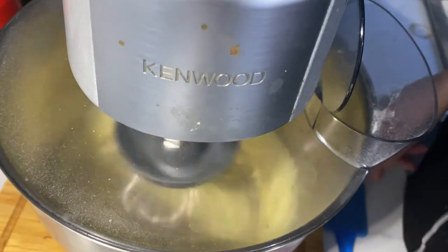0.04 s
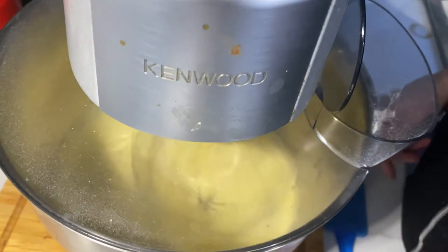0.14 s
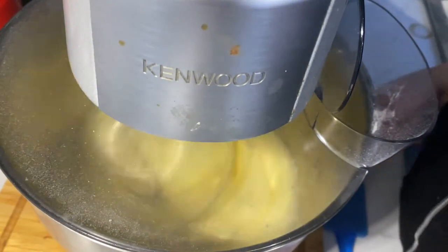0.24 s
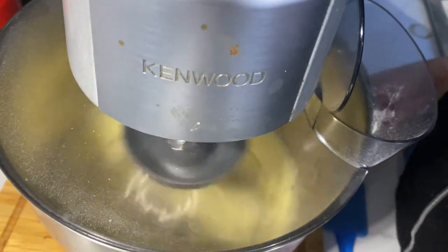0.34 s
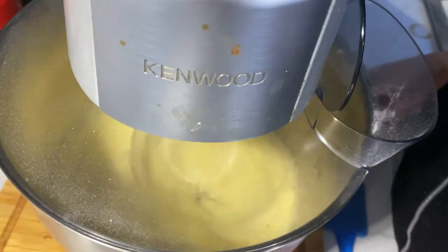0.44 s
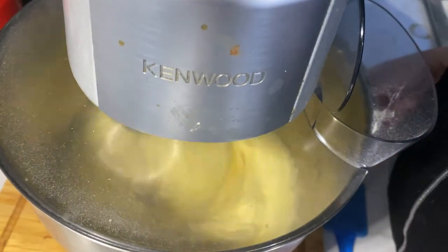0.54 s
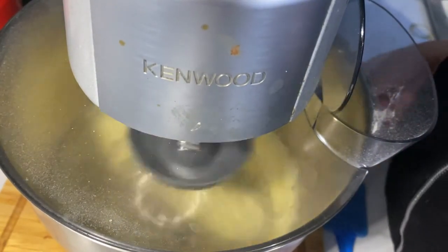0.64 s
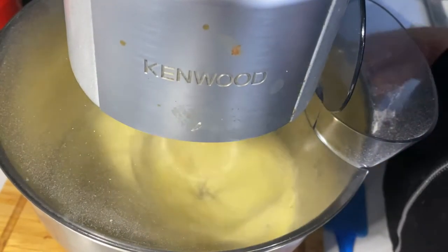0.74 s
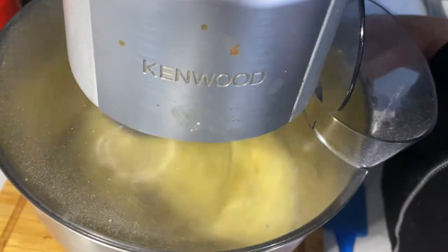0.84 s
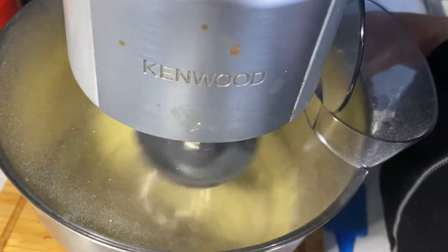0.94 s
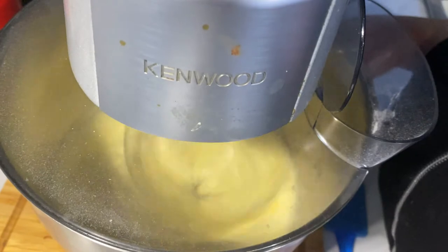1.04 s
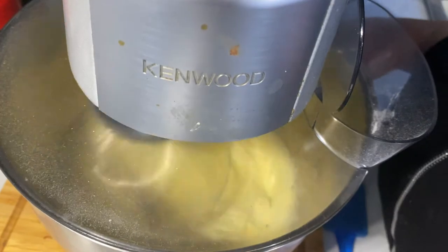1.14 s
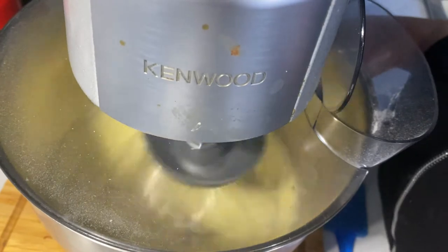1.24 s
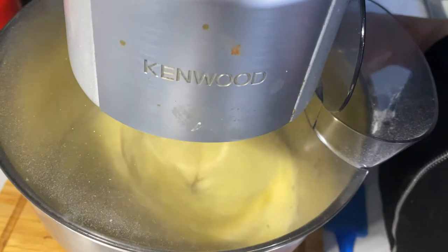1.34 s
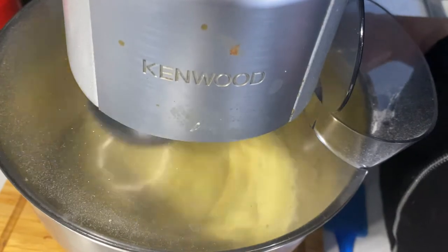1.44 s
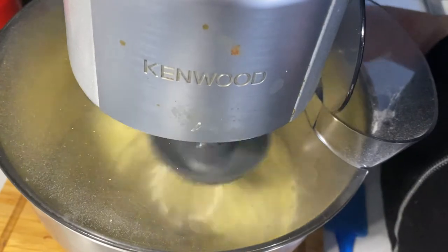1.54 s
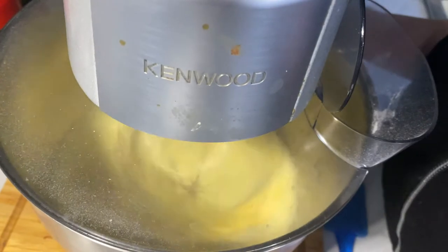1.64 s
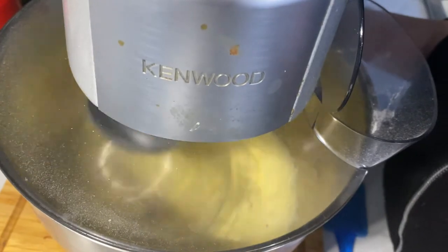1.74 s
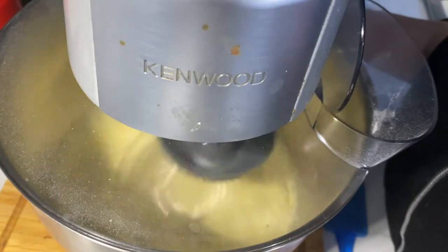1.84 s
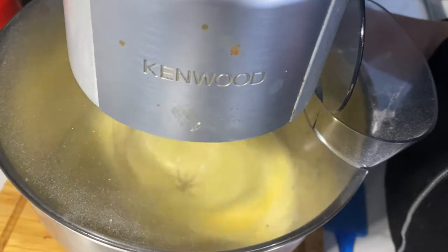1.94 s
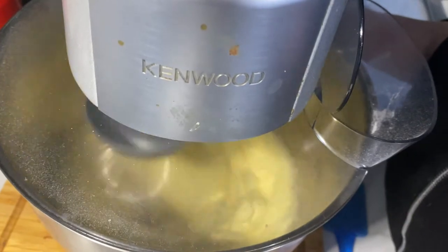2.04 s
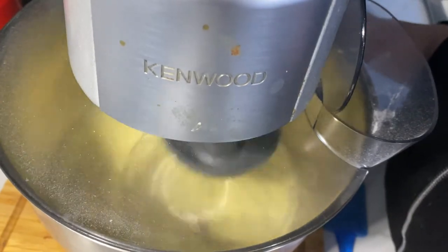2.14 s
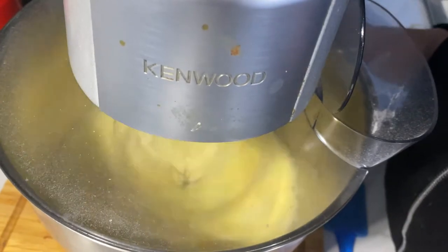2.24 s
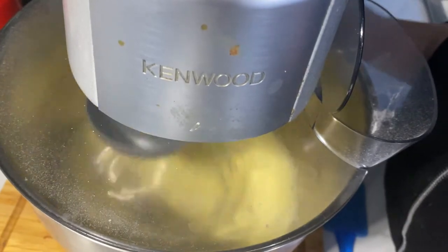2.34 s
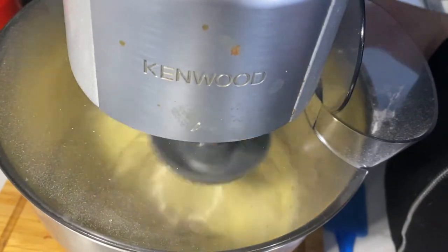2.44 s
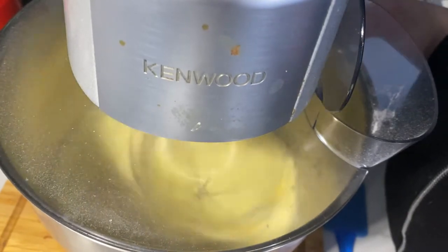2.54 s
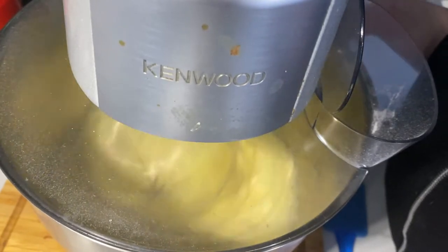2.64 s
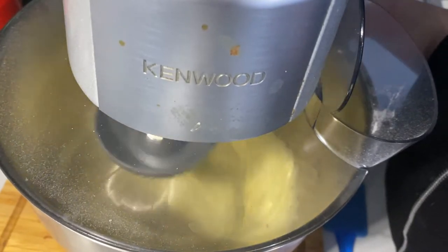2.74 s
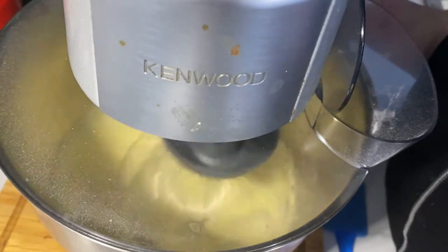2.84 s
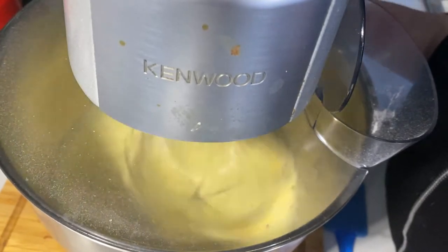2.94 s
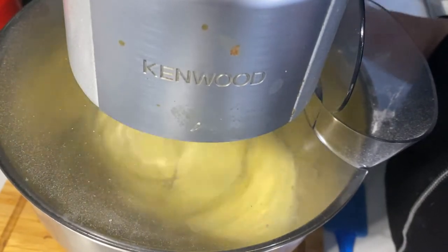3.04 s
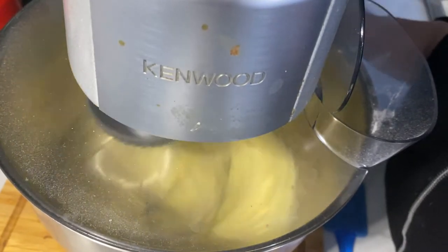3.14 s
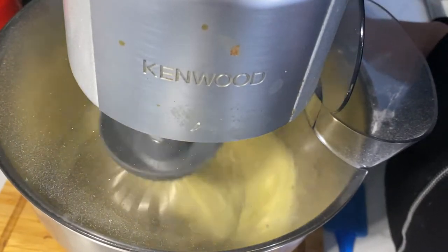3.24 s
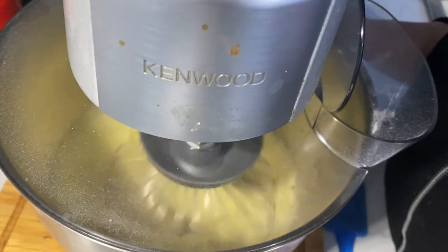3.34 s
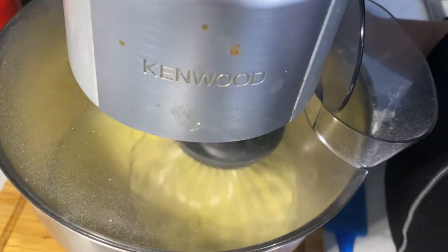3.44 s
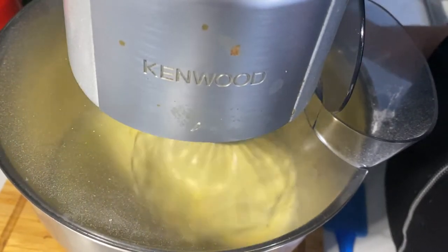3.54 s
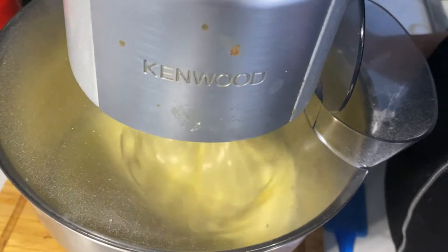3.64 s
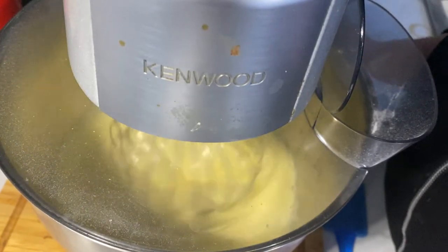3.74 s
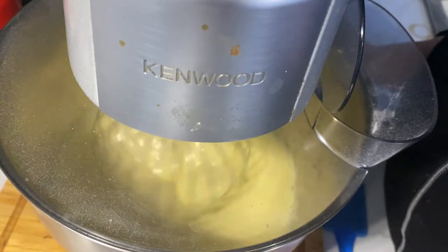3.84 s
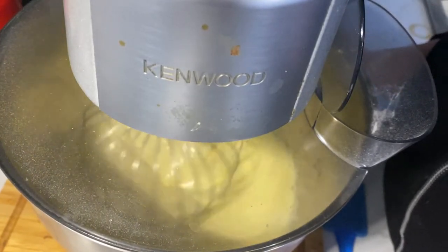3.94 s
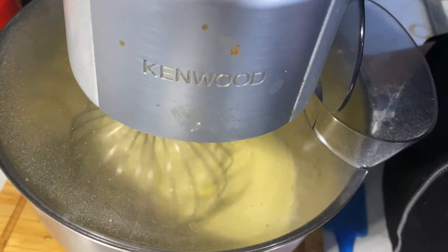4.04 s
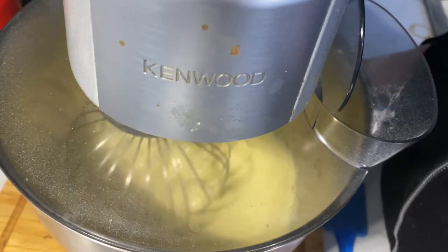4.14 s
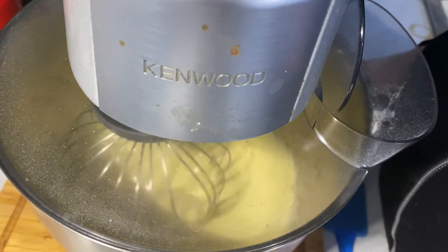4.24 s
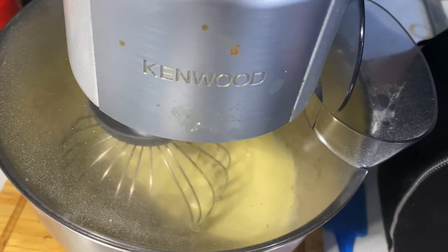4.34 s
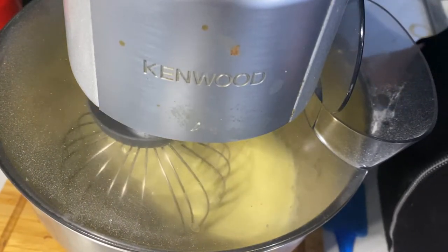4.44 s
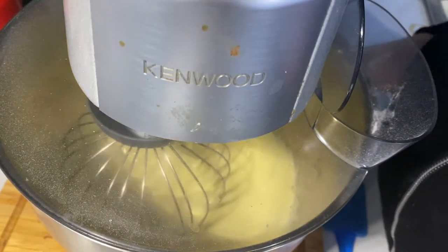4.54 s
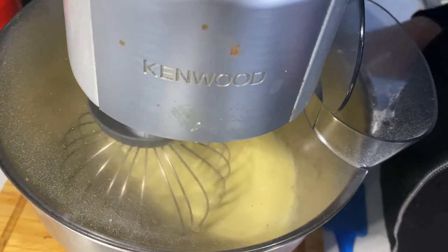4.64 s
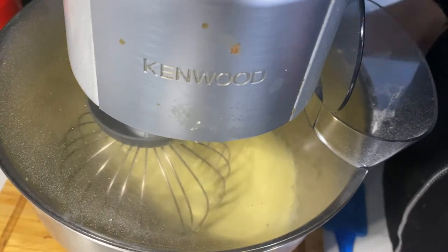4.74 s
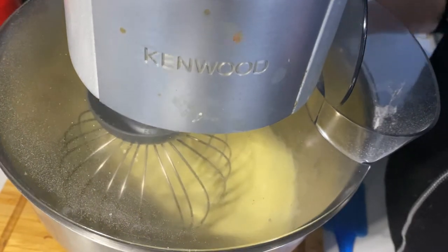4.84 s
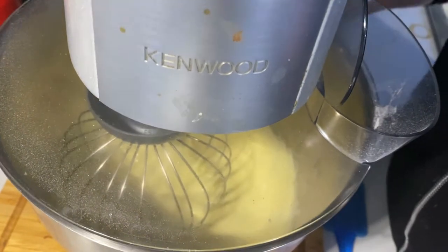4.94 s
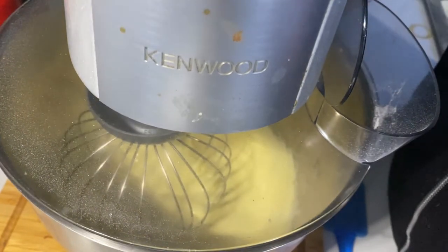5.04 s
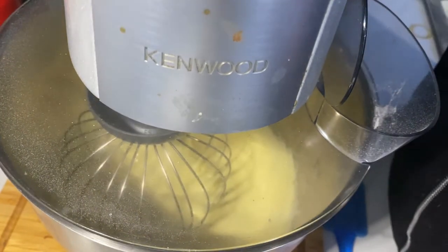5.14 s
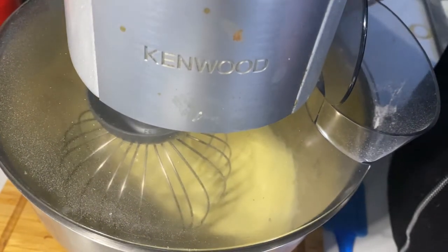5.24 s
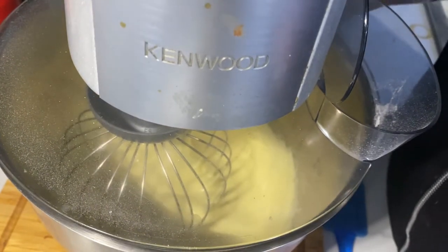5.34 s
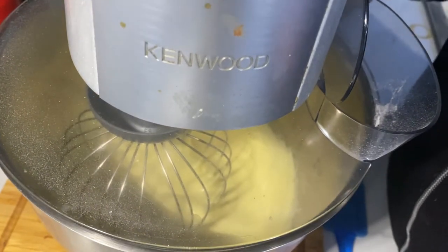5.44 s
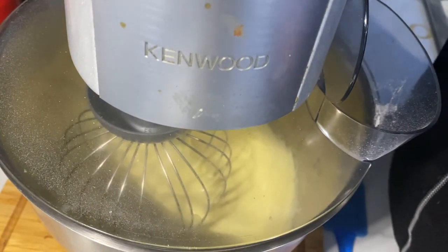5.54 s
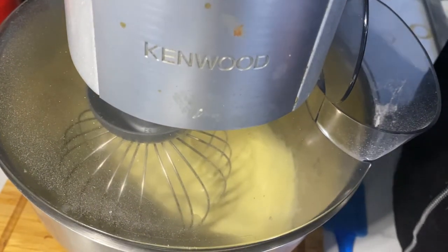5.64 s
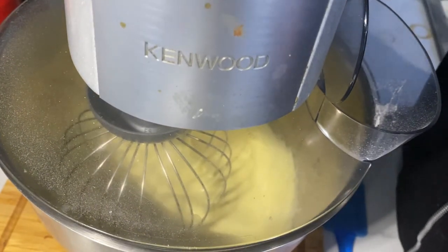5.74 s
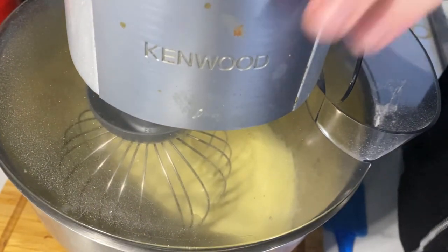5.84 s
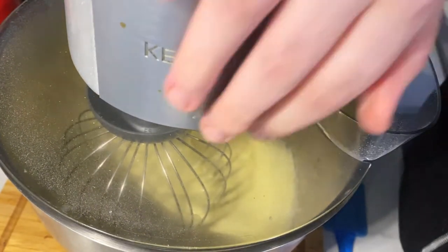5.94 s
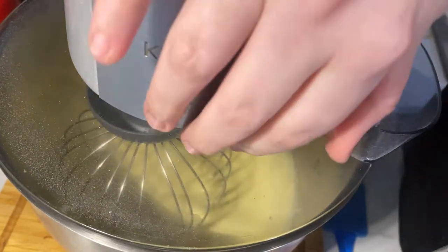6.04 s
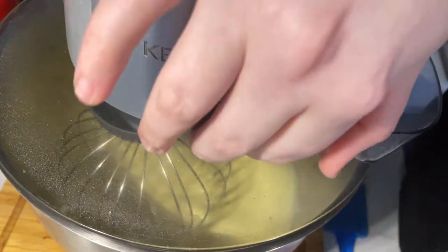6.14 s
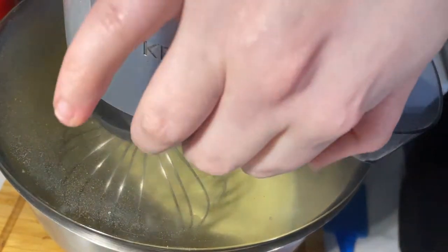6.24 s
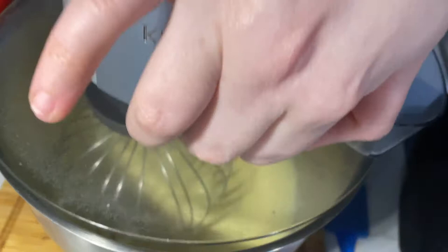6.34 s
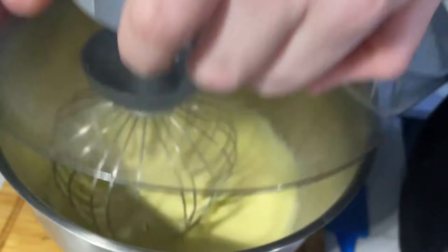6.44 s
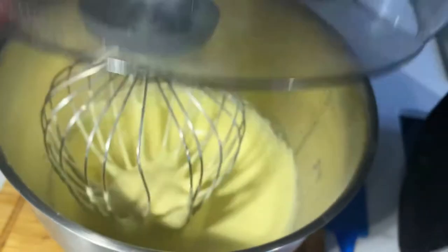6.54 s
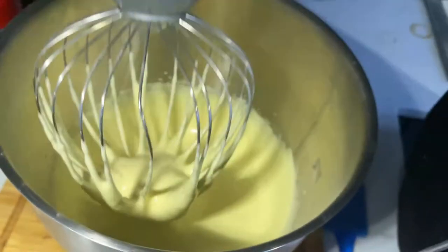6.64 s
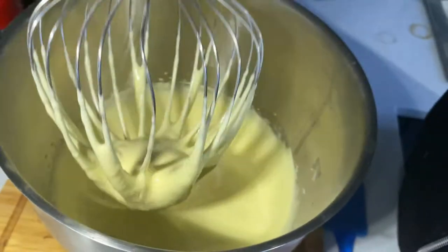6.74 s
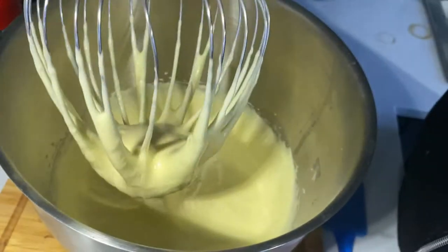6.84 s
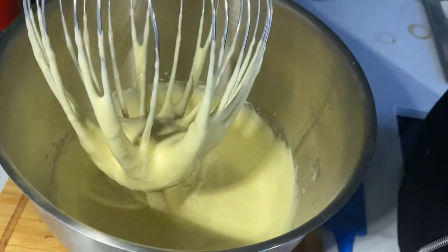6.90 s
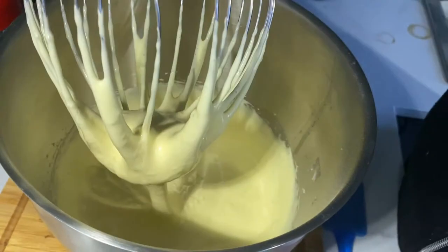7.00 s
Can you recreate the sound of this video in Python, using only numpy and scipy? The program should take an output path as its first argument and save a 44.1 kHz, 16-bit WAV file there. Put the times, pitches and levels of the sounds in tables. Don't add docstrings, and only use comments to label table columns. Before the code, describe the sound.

A loud electric mixer drones, whines and rushes steadily, close to a phone-like stereo microphone. Switched off, it coasts down in a long falling whine with passing resonances, thinning into gear rattle and a few dull knocks. In the near-quiet kitchen afterwards, hands make sharp plastic clicks, low thuds, faint skin rubbing and gritty hinge scrapes while tipping the head up. A slight short echo surrounds it.

```python
import sys
import numpy as np
from scipy import signal
from scipy.fft import rfft, irfft, next_fast_len
from scipy.io import wavfile
from scipy.ndimage import uniform_filter1d

SR = 44100
rng = np.random.default_rng(int(sys.argv[2]) if len(sys.argv) > 2 else 0)


def voltage_ratio(decibels):
    exponent = np.asarray(decibels, float) / 20
    return 10 ** exponent


def generate_wav(sig):
    pcm = np.round(np.clip(np.atleast_2d(sig).T, -1, 1) * 32767).astype(np.int16)
    wavfile.write(sys.argv[1], SR, pcm)


N = 311781
M = next_fast_len(N)
T = np.arange(N) / SR
F = np.maximum(np.arange(M // 2 + 1) * SR / M, 1)
SWITCH_OFF_S = 2.36

# (time [s], shaft speed [Hz])
MOTOR_SPEED = [(0, 227.9), (2.2, 226.6), (2.36, 212.1), (2.53, 187.8), (2.66, 171.3), (2.97, 150),
               (3.11, 136.1), (3.32, 107.1), (3.6, 79.9),
               (3.75, 67.2), (3.915, 57), (4.095, 42.7), (4.198, 34.2), (4.258, 28.5), (4.3, 24.4),
              (4.42, 12), (4.52, 1)]
# (multiple of shaft speed [-], level [dB])
SHAFT_TONES = [(.657, -38), (1.32, -47.5), (1.44, -42.5), (3.0, -44), (4.0, -40), (4.53, -46.5),
               (5.17, -44), (6.0, -65), (7.0, -36.5), (7.32, -45), (8.0, -53.5), (9.0, -42.5),
               (9.52, -47.5), (10.0, -39), (10.5, -44), (11.0, -55.5), (11.33, -54.5), (11.68, -44.5),
               (12.0, -49), (12.33, -44.5), (12.9, -48), (14.0, -43.5)]
# (frequency [Hz], width above [Hz], width below [Hz], tone level [dB])
ROCKING_SPEEDS = [(218, 50, 30, -32), (177, 26, 4, -25.5), (147, 30, 4, -28.5), (108, 36, 3, -22.5),
                  (81.5, 24, 3, -19.5), (68, 8, 6, -38)]
# (multiple of shaft speed [-], frequency [Hz], width above [Hz], width below [Hz], tone level [dB])
GEAR_ROCKING_SPEEDS = [(.657, 104, 24, 8, -32), (1.75, 175, 110, 20, -34), (3, 200, 70, 14, -43)]
# (frequency [Hz], width [Hz], level [dB])
FRAME_MODES = [(108, 23, 17.5), (193, 16, 27), (330, 43, -1.5), (1626, 83, 16), (1888, 17, 18),
               (2090, 200, 8), (1204, 110, 16)]
# (frequency [Hz], width [Hz], level [dB])
BRUSH_MODES = [(2030, 230, 0), (1000, 160, -6), (1450, 140, -6), (2430, 120, -7), (3050, 250, -7),
               (4700, 900, -8), (10500, 4000, -8)]
# (shaft speed [Hz], width [Hz], level [dB])
WHINE_PEAKS = [(160, 34, -36.5), (105, 40, -46), (48, 30, -42)]
ROAR_LAYER_HZ = [110, 420, 1500, 5000]
# (level at full speed [dB], power of speed [-], step at switch-off [dB])
ROAR_LAYER_LAWS = [(-32, 0.63, 0), (-27.5, 1.1, -1), (-28, 1.35, -1.5), (-29.5, 2.09, 1.5)]
# (frequency [Hz], level [dB per Hz])
ROAR_TONE = [(18, -68), (30, -22.5), (90, 3.5), (127, -4), (221, -6), (437, -21.5), (760, -20), (913, -17),
             (1430, -16.5), (1630, -13), (4190, -25.5), (7270, -25.5), (9220, -36.5), (11100, -35),
             (16000, -38.5)]
# (frequency [Hz], width [Hz], level [dB])
HOUSING_MODES = [(112, 10, -12.5), (512.5, 40, -3.5), (669, 11, -2), (910, 8.1, 0.5), (1160, 112, -6),
                 (1560, 10, -22), (1850, 25, -7.5), (2012, 6, -0.5), (2377, 22, -3), (3160, 46, -25),
                 (3457, 100, -5), (4710, 140, -3), (5400, 180, -11), (6020, 360, -7.5), (6890, 230, -31),
                 (7400, 150, -21)]
# (shaft speed [Hz], width [Hz], level [dB])
CHATTER_PEAKS = [(196, 11, -39.5), (150, 23, -28.5)]
# (frequency [Hz], width [Hz], level [dB])
BEARING_TONES = [(4650, 380, 1.5), (3438, 300, 1.5)]
# (time [s], level [dB])
KNOCKS = [(3.5224, -36), (3.5627, -38), (3.6198, -45), (3.6577, -46), (3.7097, -46), (3.764, -47),
          (3.8228, -35), (3.8871, -38), (3.9654, -35), (4.0477, -32), (4.1598, -34.5)]
# (frequency [Hz], level [dB])
CASE_MODES = [(950, 4), (1400, 3.5), (1700, -10), (2050, 5), (2400, 3), (2800, -5), (3300, -2), (4000, 0),
              (4700, -21), (5600, -15), (6500, -16), (7600, -30), (11000, -27)]
# (frequency [Hz], level [dB], time to fade by 60 dB [s])
BOWL_MODES = [(1100, -13, 0.068), (2100, -36, .1)]
# (middle [s], half length [s], level [dB])
WORKTOP_THUMPS = [(4.357, 0.05, -34.5), (4.457, 0.025, -43), (4.57, .05, -37), (4.743, 0.04, -34),
                  (4.916, 0.088, -32), (5.018, 0.054, -36), (5.2, 0.025, -49), (5.355, 0.077, -40.5),
                  (5.52, 0.093, -51), (5.69, .04, -48), (5.854, 0.081, -48), (6.034, .05, -51),
                  (6.227, .04, -50), (6.338, 0.023, -43), (6.45, 0.1, -43), (6.603, .07, -39.5),
                  (6.76, 0.041, -36.5), (6.87, 0.11, -43.5), (6.978, 0.089, -44.5)]
# (middle [s], half length [s], level [dB], centre [Hz])
HAND_RUBS = [(4.553, .04, -66, 1700), (4.728, 0.036, -58, 420), (4.933, 0.079, -49, 420),
             (5.195, 0.05, -56, 2740), (5.3, 0.052, -59, 600), (5.398, 0.11, -60.5, 2000),
             (5.69, 0.067, -59, 1200), (5.813, 0.078, -46, 1200), (6.17, 0.079, -65.5, 9000),
             (6.524, 0.1, -51.5, 1200), (6.534, 0.11, -64, 6500), (6.72, 0.15, -49, 420),
             (6.764, 0.072, -57, 5000), (6.934, 0.21, -47, 1300)]
HANDS_LAYER_HZ = [90, 420, 1700, 6500]
QUIET_DB = [-52.5, -69, -72.5, -95]
# (frequency [Hz], level [dB per Hz])
HANDS_TONE = [(15, -27.5), (25, -9.5), (59, -2), (180, -8.5), (270, -10), (405, -13.5), (677, -21),
              (911, -22), (1840, -30.5), (7510, -38), (9070, -47.5), (10700, -37.5), (16000, -54)]
# (frequency [Hz], width [Hz], level [dB])
HINGE_MODES = [(400, 40, 8), (520, 40, 5), (640, 40, 8), (960, 70, 11), (1200, 60, 11), (1830, 40, 13),
               (2080, 80, 13), (2600, 100, 10), (2950, 80, 10), (3600, 200, 6)]
# (time [s], click level [dB], ring pitch [Hz], thud level [dB], thud pitch [Hz])
CLICK_EVENTS = [(4.516, -57, 947, -44, 232), (4.548, -48.5, 2560, -36.5, 230),
                (4.638, -43, 1110, -47.5, 222), (4.715, -55, 957, -42, 296), (4.756, -56, 942, -54, 230),
                (4.827, -49.5, 910, -39, 260), (4.887, -37, 934, -47, 300), (4.926, -27.5, 940, -25.5, 300),
                (5.29, -56, 929, -47, 402), (5.336, -24, 1100, -37.5, 205), (6.397, -54, 1170, -41.5, 230),
                (6.411, -45, 1160, -40.5, 303), (6.644, -50, 1020, -34, 397), (6.734, -64, 1020, -33, 192)]
# (time [s], level [dB], time to fade by 60 dB [s], centre [Hz], width [Hz])
SLIDES = [
    (5.655, -56, .42, 2520, 4000),
    (5.737, -35.5, 0.39, 2560, 6900),
    (5.985, -53.5, 0.26, 6670, 7000),
    (5.985, -57, 0.75, 13000, 9000),
    (6.397, -52, 0.46, 1300, 2510),
    (6.704, -46, .43, 2640, 900),
    (6.725, -31, 0.34, 4060, 3720),
    (6.91, -71, .56, 2500, 5000),
]
# (frequency [Hz], share [0-1])
SHARED_SOUND = [(60, 1), (130, 0.96), (290, 0.46), (640, 0.4), (1400, 0.33), (3000, 0.56), (6000, 0.57),
                (9000, 0.67), (15000, 0.27)]
# (frequency [Hz], left minus right [dB])
LEFT_RIGHT_DB = [(60, 5), (110, -2.5), (200, 4), (380, -2.5), (700, 7.5), (1290, 2.5), (2380, 4.5),
                 (4400, 7.5), (8120, 1.5), (15000, -0.5)]
# (frequency [Hz], lead of left [rad])
LEFT_LEAD = [(0, 0), (200, 0), (2240, 1.3), (4050, .4), (5340, 2), (6400, 1.2), (7225, 0), (16500, -14.4)]
# (frequency [Hz], width [Hz])
CANCELLED_PITCHES = [(9250, 900), (13300, 1200)]


def on_log(table, hz):
    f, value = np.transpose(table)
    return np.interp(np.log(np.maximum(hz, 1)), np.log(np.maximum(f, 1)), value)


def unit(x):
    return x / np.sqrt(np.mean(x ** 2))


def walk(rate):
    hold = int(SR / rate)
    choices = np.repeat(rng.standard_normal(N // hold + 1), hold)
    return uniform_filter1d(choices, hold)[:N]


def resonances(modes, hz):
    return sum(voltage_ratio(db) ** 2 / (1 + (2 * (hz - f) / width) ** 2) for f, width, db in modes)


def housing(hz, lift_db):
    return np.sqrt(1 + voltage_ratio(lift_db) ** 2 * resonances(HOUSING_MODES, hz))


def ring(x, hz, t60):
    hz, t60 = min(hz, .45 * SR), max(t60, .003)
    pole = np.exp(2j * np.pi * hz / SR - np.log(1000) / (t60 * SR))
    return signal.lfilter([1], [1, -pole], x).imag


def case_ring(burst):
    out = 0
    for hz, db in CASE_MODES:
        shift = 1 + 0.042 * rng.standard_normal()
        out = out + voltage_ratio(db) * ring(burst, hz * shift, .011)
    return out + sum(voltage_ratio(db) * ring(burst, hz, t60) for hz, db, t60 in BOWL_MODES)


def spread(x, pan_db, lag):
    return np.array([x * voltage_ratio(pan_db / 2), np.roll(x, lag) * voltage_ratio(-pan_db / 2)])


def noise(gain, curves, layer_hz, likeness, lean, flicker_db, flicker_rate):
    common, left, right = (rfft(rng.standard_normal(M)) * gain for _ in range(3))
    like = np.clip(likeness, 0, 1)
    shared = np.sqrt(like) * common
    tilt = voltage_ratio(lean * on_log(LEFT_RIGHT_DB, F) / 2)
    turn = np.exp(1j * lean * np.interp(F, *np.transpose(LEFT_LEAD)))
    ports = np.array([tilt * (shared * turn + np.sqrt(1 - like) * left),
                      (shared + np.sqrt(1 - like) * right) / tilt])
    power = np.abs(ports[0] + ports[1]) ** 2 / 4
    octave = np.log2(np.array(layer_hz))
    near = [np.abs(np.log2(F) - o) < 1 for o in octave]
    layer_db = [10 * np.log10(2 * power[bins].sum() / M ** 2) for bins in near]
    out = 0
    for centre in np.log2(20) + np.arange(20) / 2:
        window = np.clip(1 - 2 * np.abs(np.log2(F) - centre), 0, 1)
        band = irfft(ports * window, M)[:, :N]
        shares = [np.interp(centre, octave, row) for row in np.eye(len(octave))]
        db = sum(w * (curve - own) for w, curve, own in zip(shares, curves, layer_db) if w)
        out = out + band * voltage_ratio(db + flicker_db * walk(flicker_rate))
    return out


def shaft():
    s, speed = np.transpose(MOTOR_SPEED)
    hz = np.maximum(np.interp(T, s, speed), 1)
    return hz, 20 * np.log10(hz / hz[0])


def rocking(modes, hz):
    power = 0
    for f, above, below, db in modes:
        width = np.where(hz > f, above, below)
        steepness = np.where(hz > f, 4, 2)
        power = power + voltage_ratio(db) ** 2 / (1 + 2 * (2 * (hz - f) / width) ** steepness)
    return np.sqrt(power)


def critical(speeds, hz):
    return np.sqrt(resonances(speeds, hz)) * np.minimum(hz / 31.7, 1) ** 0.66


def brush_whine(hz, turns):
    bars, soft_above = 12, 9
    out = 0
    for k in range(1, 25):
        tone = np.sin(2 * np.pi * (k * bars * turns + rng.random()))
        gain = np.repeat(resonances(BRUSH_MODES, k * bars * hz[::64]), 64)[:N]
        out = out + tone / (1 + (k / soft_above) ** 3) * gain
    return out * critical(WHINE_PEAKS, hz)


def motor_tones():
    hz = shaft()[0]
    full = hz[0]
    turns = np.cumsum(hz * (1 + .0012 * walk(6))) / SR
    low = np.sqrt(2) * rocking(ROCKING_SPEEDS, hz) * voltage_ratio(2.6 * walk(14)) * np.sin(2 * np.pi * turns)
    mains_on = np.clip((SWITCH_OFF_S - T) / 0.015, 0, 1)
    low += np.sqrt(2) * voltage_ratio(-29.5 + 1.3 * walk(36)) * np.sin(2 * np.pi * 100.9 * T) * mains_on
    for k, *mode in GEAR_ROCKING_SPEEDS:
        wobble = voltage_ratio(4.0 * walk(25))
        low += np.sqrt(2) * rocking([mode], k * hz) * wobble * np.sin(2 * np.pi * k * turns)
    high = 0
    for k, db in SHAFT_TONES:
        boost = 1 + resonances(FRAME_MODES, k * hz[::64])
        lift = np.sqrt(boost / (1 + resonances(FRAME_MODES, k * full)))
        unload_db = -7.5 * (T > SWITCH_OFF_S) * (1 < k < 8)
        level = voltage_ratio(db + 1.7 * walk(22) + unload_db)
        gain = np.repeat(lift, 64)[:N] * (hz / full) ** 1.8 * level
        tone = np.sqrt(2) * gain * np.sin(2 * np.pi * (k * turns + rng.random()))
        if k < 3:
            low = low + tone
        else:
            high = high + tone
    return spread(low, .6, lag=0) + spread(high + brush_whine(hz, turns), 2.6, lag=4.2)


def roar():
    hz, speed_db = shaft()
    stall_hz, stall_power, knock_lift_db, knock_fade_s = 97.35, 0.49, 7.0, .016
    shake_db = stall_power * 20 * np.log10(np.minimum(hz / stall_hz, 1))
    for s, _ in KNOCKS:
        shake_db += knock_lift_db * (T > s) * np.exp(-np.abs(T - s) / knock_fade_s)
    curves = []
    for db, power, step_db in ROAR_LAYER_LAWS:
        curves.append(db + power * speed_db + step_db * (T > SWITCH_OFF_S) + shake_db)
    curves[-1] += 3.0 * np.exp(-((T - 2.3) / .06) ** 2)
    gain = voltage_ratio(on_log(ROAR_TONE, F)) * housing(F, 10.0)
    return noise(gain, curves, ROAR_LAYER_HZ, on_log(SHARED_SOUND, F), 1, 1.05, 24.86)


def chatter():
    hz, speed_db = shaft()
    rattle = rfft(rng.standard_normal((2, M)) + 0.78 * rng.standard_normal(M))
    teeth = unit(irfft(rattle * resonances(FRAME_MODES[3:], F), M)[:, :N])
    teeth = teeth * critical(CHATTER_PEAKS, hz) * voltage_ratio(0.64 * speed_db)
    bearings = unit(irfft(rattle * resonances(BEARING_TONES, F), M)[:, :N])
    loaded_db = -13.5 * (T < SWITCH_OFF_S)
    bearings = bearings * voltage_ratio(-44.5 + 0.96 * speed_db + loaded_db)
    return (teeth + bearings) * voltage_ratio(2.0 * walk(14) + np.array([[2], [-2]]))


def gear_knocks():
    out = np.zeros(N)
    n = np.arange(1200)
    for s, db in KNOCKS:
        burst = rng.standard_normal(len(n)) * np.exp(-n / SR / 0.0048)
        tap = unit(case_ring(burst)) + 0.61 * unit(ring(burst, 4670, 0.0092))
        tap += 1.9 * unit(ring(burst, 540, 0.044)) + 1.0 * unit(ring(burst, 362, 0.052))
        out[int(s * SR):][:len(n)] += voltage_ratio(db) * tap / np.abs(tap).max()
    return spread(out, 5.0, lag=1.2)


def swell(s, half_s, db):
    return voltage_ratio(db) ** 2 * np.exp(-2 * ((T - s) / half_s) ** 2)


def hands():
    power = voltage_ratio(np.array(QUIET_DB))[:, None] ** 2 + np.zeros(N)
    for s, half_s, db, hz in HAND_RUBS:
        octaves_away = np.abs(np.log2(np.array(HANDS_LAYER_HZ) / hz))
        reach = voltage_ratio(-8 * octaves_away) ** 2
        power += reach[:, None] * swell(s, half_s, db)
    power[0] += sum(swell(*row) for row in WORKTOP_THUMPS)
    gain = voltage_ratio(on_log(HANDS_TONE, F)) * np.sqrt(1 + resonances(HINGE_MODES, F))
    likeness = on_log(SHARED_SOUND, F) ** 0.65
    return noise(gain, 10 * np.log10(power), HANDS_LAYER_HZ, likeness, 0.25, 1.9, 30)


def clicks():
    out, n = np.zeros((2, N + SR)), np.arange(SR // 3)
    for s, db, hz, thud_db, thud_hz in CLICK_EVENTS:
        chance = rng.standard_normal((2, len(n)))
        burst = chance[0] * np.exp(-(n / SR / 0.011) ** 2)
        crack = unit(case_ring(burst)) + 0.53 * unit(ring(burst, hz, 0.035))
        push = chance[1] * np.exp(-n / SR / 0.0099)
        thud = ring(push, thud_hz, 0.14) + .2 * ring(push, 1.2 * thud_hz, 0.52)
        thud += 0.69 * ring(push, 0.774 * thud_hz, 0.11) + 0.57 * ring(push, 1.43 * thud_hz, 0.028)
        hit = voltage_ratio(db) * crack / np.abs(crack).max()
        hit += voltage_ratio(thud_db) * thud / np.abs(thud).max()
        out[:, int(s * SR):][:, :len(n)] += spread(hit, 4, lag=0)
    return out[:, :N]


def scrapes():
    out, t = np.zeros((2, N + SR)), np.arange(SR // 2) / SR
    f = np.arange(len(t) // 2 + 1) * SR / len(t)
    for s, db, t60, hz, width_hz in SLIDES:
        grit = rng.standard_normal((2, len(t))) * voltage_ratio(2.1 * rng.standard_normal(len(t)))
        colour = np.sqrt(1 + resonances(HINGE_MODES, f)) / (1 + (2 * (f - hz) / width_hz) ** 2)
        colour += voltage_ratio(-32.5) * (f > 6000)
        shape = (1 - np.exp(-t / 0.0076)) * voltage_ratio(-60 * t / t60)
        slide = unit(irfft(rfft(grit) * colour, len(t))) * shape
        out[:, int(s * SR):][:, :len(t)] += voltage_ratio(db) * slide
    return out[:, :N]


def kitchen(x):
    t60_s, level_db = 0.31, -11
    t = np.arange(SR // 2) / SR
    tail = rng.standard_normal((2, len(t))) * voltage_ratio(-60 * t / t60_s) * (t > .004)
    tail = signal.lfilter([1], [1, -.5], tail)
    tail = voltage_ratio(level_db) * tail / np.sqrt((tail ** 2).sum(axis=1, keepdims=True))
    tail = signal.sosfilt(signal.butter(2, 250, "high", fs=SR, output="sos"), tail)
    return x + signal.fftconvolve(x, tail, axes=1)[:, :N]


def scene():
    echoing = kitchen(motor_tones() + gear_knocks() + clicks())
    return echoing + roar() + chatter() + hands() + scrapes()


def low_pass(x):
    return signal.sosfilt(signal.butter(12, 16530, fs=SR, output="sos"), x)


def record(dry):
    nulls = np.prod([1 - np.exp(-(2 * (F - hz) / width) ** 4) for hz, width in CANCELLED_PITCHES], axis=0)
    mid = irfft(rfft(dry.mean(axis=0), M) * nulls, M)[:N]
    side = (dry[0] - dry[1]) / 2
    top_cut = signal.ellip(8, .2, 60, 15250, fs=SR, output="sos")
    low_cut = signal.butter(2, 36, "high", fs=SR, output="sos")
    mix = signal.sosfilt(top_cut, [mid + side, mid - side])
    mix = signal.sosfilt(low_cut, mix)
    return low_pass(mix)


dry = scene()
out = record(dry)
generate_wav(out)
```